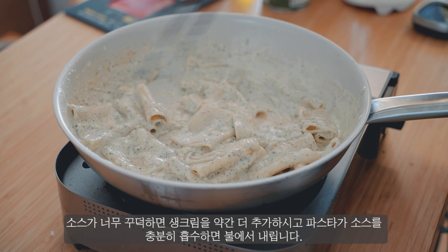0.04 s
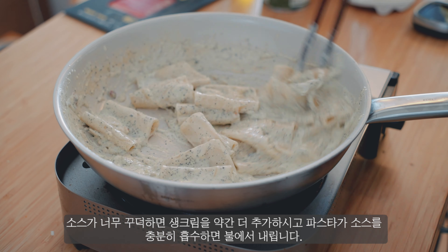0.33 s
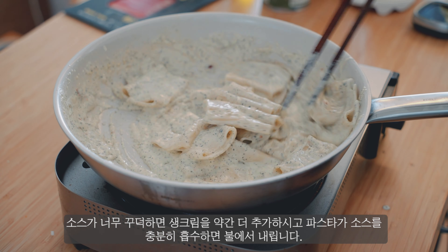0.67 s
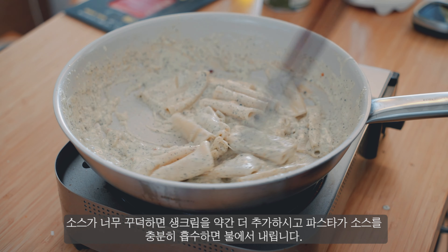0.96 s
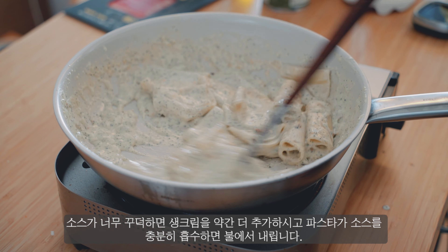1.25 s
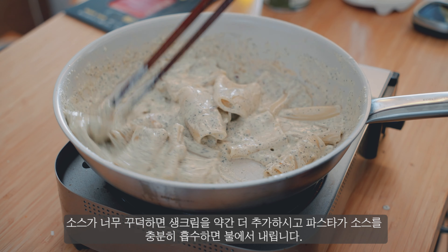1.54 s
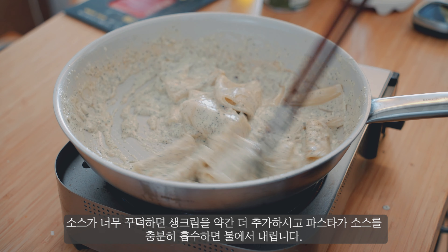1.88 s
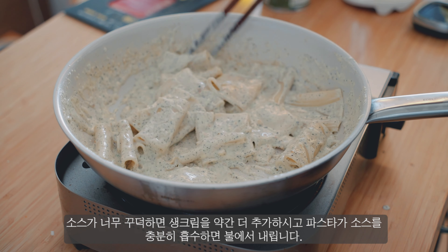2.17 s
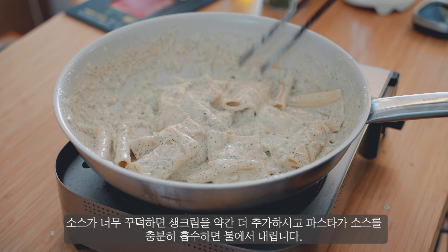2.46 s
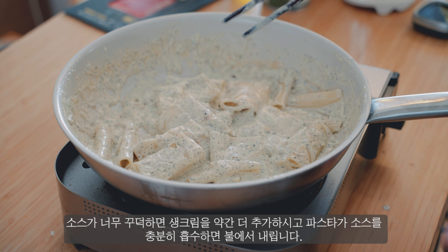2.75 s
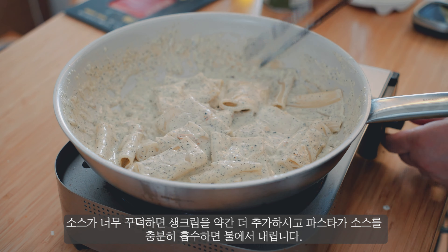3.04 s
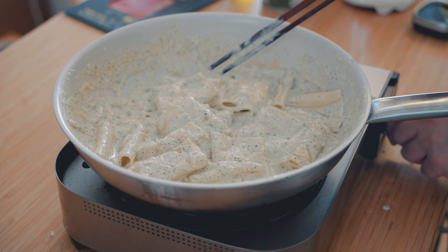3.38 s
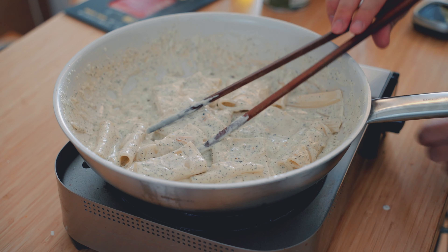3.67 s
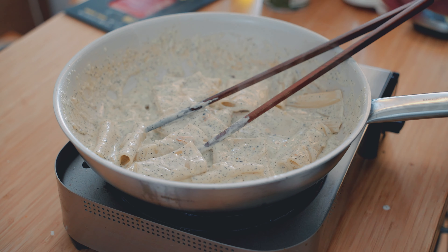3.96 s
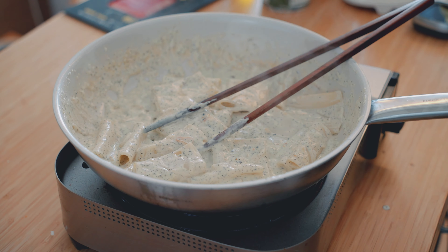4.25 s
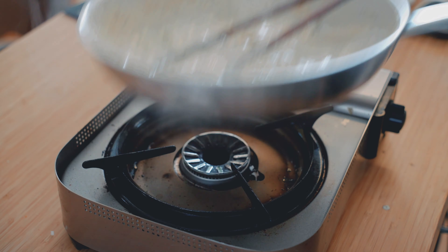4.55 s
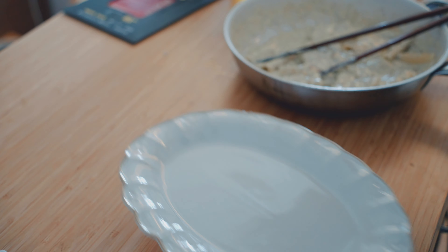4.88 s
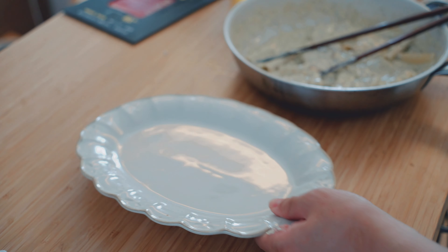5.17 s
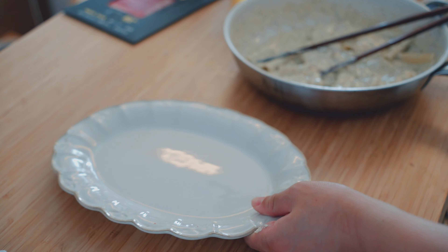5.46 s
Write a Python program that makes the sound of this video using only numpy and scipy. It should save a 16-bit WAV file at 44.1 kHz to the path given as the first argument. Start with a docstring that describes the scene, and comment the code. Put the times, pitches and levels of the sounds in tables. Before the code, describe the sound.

Chopsticks squelch through pasta and prod a frying pan while the sauce hisses and bubbles over a low gas burner. Three sharp, ringing taps on the rim follow, then a few dull stove knocks as the flame goes out. The sizzle dies away, leaving a quiet small kitchen. Finally a china plate is set down hard on wood right by the microphone, with a short scrape.

```python
"""A small kitchen, with pasta in cream sauce simmering in a frying pan on a portable gas stove. Steam hisses
and bubbles burst over the rumble of the flame, while long chopsticks stir, then tap the rim once softly and
three times hard and set it ringing. The gas is turned off and the pan is lifted away. Close to the microphone,
a china plate is set down hard on a wooden table and slid into place."""
import sys
import numpy as np
from scipy import signal
from scipy.io import wavfile

SR = 44100
rng = np.random.default_rng(int(sys.argv[2]) if len(sys.argv) > 2 else 0)


def waveform_to_disk(signal):
    """Save audio, clipped to [-1, 1], as 16-bit WAV at the path in sys.argv[1]."""
    frames = np.transpose(np.atleast_2d(signal))
    scaled = np.clip(frames, -1, 1) * 32767
    samples = np.round(scaled).astype(np.int16)
    wavfile.write(sys.argv[1], SR, samples)


N = 252252
TIME = np.arange(N) / SR
RING = TIME[:SR * 4 // 5]  # time axis of one blow dying away

# still kitchen air: frequency_hz, level_db
AIR_COLOUR = [(25, -16.5), (55, -4.5), (130, -8), (300, -4), (450, -9.5), (650, -15), (1200, -15.5),
              (2500, -24), (6500, -31), (16000, -38.5)]
# how long the walls echo: frequency_hz, t60_s
ROOM_DECAY = [(100, 0.61), (1000, 0.44), (5000, 0.18), (16000, 0.26)]
# the burner's rumble: frequency_hz, level_db
BURNER_COLOUR = [(30, -20.5), (70, -11.5), (130, -2), (220, 1), (330, -4.5), (480, -5.5), (700, -30.5),
                 (1500, -39.5)]
# dull knocks of gas knob, stove and pan support: start_s, level_db, centre_hz, t60_s
STOVE_KNOCKS = [(3.398, -37, 1180, 0.11), (3.411, -22.5, 1460, 0.039), (3.415, -29.5, 390, 0.071),
                (3.547, -40, 273, 0.15), (3.684, -38.5, 216, 0.14), (3.735, -41, 294, 0.42),
                (3.845, -29, 940, 0.027), (4.199, -29.5, 585, 0.17), (4.357, -41.5, 1140, 0.14),
                (4.415, -32.5, 530, 0.099)]
# sauce frying on hot metal: frequency_hz, level_db
SAUCE_COLOUR = [(200, 7), (500, -4.5), (1000, 7), (2000, 1), (4000, 2), (6500, -0.5), (9000, -3.5),
                (12000, -6), (16000, -6)]
# the crackle of larger bubbles: frequency_hz, level_db
BUBBLE_COLOUR = [(300, -30.5), (1200, 4), (3500, 0.5), (7000, 1.5), (10000, -9.5), (16000, -19.5)]
# how much the sauce is moved, by stirring and at last by lifting: time_s, agitation_0_to_1
SAUCE_AGITATION = [(0, 0.66), (.3, 0.16), (.68, 0.5), (1.33, 1), (1.9, 0.7), (2.35, 0.74), (2.88, .15),
                   (4.3, 0), (4.54, 0.66)]
# the largest bubbles bursting: start_s, peak_db, pitch_hz, t60_s
BUBBLE_POPS = [(0.215, -29, 5460, 0.034), (1.8119, -20, 5100, 0.0045), (1.941, -17, 5160, 0.0013),
               (2.424, -21.5, 6950, 0.001), (3.8164, -17.5, 3510, 0.0071), (3.8555, -27, 3480, 0.0038),
               (4.0668, -14.5, 3760, 0.0057), (4.179, -12, 3600, .0042), (4.4131, -18, 3650, 0.0055),
               (5.6768, -44.5, 4630, .0039)]
# wet pasta: frequency_hz, level_db
SQUELCH_COLOUR = [(200, -28), (480, 14.5), (750, -5), (1200, 4), (1950, -3), (2500, 2), (4000, -26),
                  (9000, -60)]
# the pan floor, damped by sauce: pitch_hz, level_db, t60_s
PAN_MODES = [(493, 3, 0.1), (1160, -11, 0.063), (1650, -73, 0.0053), (2000, 8, 0.0078), (2780, -4.5, 0.035),
             (3630, -12, 0.056)]
# chopsticks dragged over the pan floor: start_s, length_s, level_db, centre_hz, ring_share_db
STIR_STROKES = [(0.07, .11, -45.5, 1060, -1), (.217, 0.094, -43.5, 1180, -2), (0.347, 0.19, -43, 1080, -2),
                (.6, .019, -36, 960, 4), (0.729, 0.1, -40, 640, 1), (0.897, .1, -48, 1490, -7),
                (1.076, 0.072, -45, 1100, 5), (1.5, 0.18, -45.5, 1300, 0), (2.145, 0.16, -47.5, 790, 1.5),
                (3.718, 0.074, -41, 1240, 2)]
# chopstick tips meeting the pan floor: start_s, knock_peak_db, centre_hz, tick_peak_db, tick_hz
TIP_PRODS = [(.002, -23.5, 2400, -25, 4220), (.074, -27, 1100, -42, 3500), (0.4512, -22.5, 940, -45, 4500),
             (0.6037, -22.5, 1560, -43, 4500), (.678, -32.5, 1530, -20, 5400),
             (.838, -28, 2040, -21.5, 4600), (1.161, -16, 1470, -6, 11300), (3.371, -32, 1520, -24, 4180),
             (3.724, -28, 1320, -37, 3500)]
# chopsticks on the rim, each spot favouring one pitch: start_s, gain_db, tilt_db_per_octave, spot_hz
RIM_TAPS = [(2.13, -41.5, -5.5, 1190), (2.966, -20, -1, 3600), (3.0757, -19, 0.34, 3730),
            (3.2083, -20, -0.97, 2700)]
# the rim and the sticks ringing: pitch_hz, level_db, t60_s
RIM_MODES = [(253.5, -8.5, 0.19), (547, -12, 0.47), (969, -11, 0.31), (1213, -1, 0.13), (1503, -17, 0.38),
             (1777, 3.5, 0.095), (2030, -14.5, 0.047), (2036, 2, 0.075), (2365, -12, 0.054),
             (2592, -9.5, 0.43), (2805, 3, 0.045), (3295, 4.5, 0.023), (3510, 2.5, 0.15), (4360, 1, 0.083),
             (5170, 9, 0.043), (6140, 10.5, 0.043), (6630, -7.5, .11), (7640, 11, 0.019), (8720, 3, 0.024),
             (9630, 1, 0.031), (11700, -4.5, 0.031)]
# the clack of stick on metal: frequency_hz, level_db
CLACK_COLOUR = [(90, -23), (190, -12.5), (290, 0), (390, -16.5), (620, -9), (820, -11.5), (1450, -18),
                (2500, -2), (3400, -8.5), (4500, -12), (8000, -13), (10000, -19.5), (16000, -30.5)]
# china thudding on wood: frequency_hz, level_db
THUD_COLOUR = [(30, -44), (100, -12.5), (190, -0.5), (300, 1), (375, -6.5), (540, 4.5), (850, -3),
               (1700, -0.5), (2500, -10), (3300, -22.5), (5000, -34), (9000, -39), (16000, -66)]
# plate and table top ringing together: pitch_hz, level_db, t60_s
PLATE_MODES = [(179.5, -7, 0.27), (238.5, -8, 0.12), (302, -9, 0.27), (473, -11, 0.5), (562, -6.5, 0.39),
               (674, -11.5, 0.38), (943, -0.5, 0.23), (1015, -4, 0.31), (1070, -17.5, 0.14),
               (1465, -16, .1), (1615, -9, .14), (1830, -15.5, 0.12), (2236, -11, .1), (2650, -26, 0.1),
               (2620, -24, .14), (3450, -23, 0.13), (3790, -22, .11), (4130, -25, 0.13),
               (4940, -31.5, 0.13), (5620, -38.5, .13), (6300, -38.5, 0.12)]
# the table top under the full blow, heavily damped: pitch_hz, level_db, t60_s
TABLE_MODES = [(102, -34, 0.051), (580, -4, 0.044), (780, -1, 0.034), (923, 3.5, 0.032), (1490, 1.5, 0.03),
               (1825, -1.5, .025), (2380, -10.5, 0.017)]

TURN_DOWN_S, GAS_OFF_S, LIFT_S, HUSH_S = 2.7, 3.3, 4.54, 4.85
LAND_S, REST_S, BRAKE_S = 5.3052, 5.625, 0.071  # the plate brakes just before it rests
AIR_DB, HUM_HZ, HUM_DB = -57, 184, -61
FLAME_DB, FLAME_LOW_DB, FLAME_OUT_DB_PER_S = -47, -3, 130
STEAM_DB, STEAM_RISE_DB, SPRAY_DB, SPRAY_RISE_DB = -50.5, 5.5, -57, 6.5  # rises at full agitation
CRACKLE_DB, CRACKLE_GROWTH_DB_PER_S = -52, 2  # grows to this level as the sauce thickens
RECEDE_DB_PER_S, OFF_HEAT_DB = 37, -65
BLOW_DB, ROCK_DB, ROCK_LOSS_DB, ROCK_DULL_DB = -12, -20.5, .65, 0.8
ROCK_GAP_S, ROCK_JITTER_S = .0102, .0008
SLIDE_DB, SETTLE_DB, SETTLE_S = -33.5, 15, 0.072  # friction eases as the plate settles
JUDDER_HZ, JUDDER_RISE_HZ_PER_S = 241, 270


def amp(db):
    """Decibels to gain."""
    return 10 ** (np.asarray(db) / 20)


def unit(x):
    """Scales to an rms of 1."""
    return x / np.sqrt(np.mean(x ** 2) + 1e-20)


def read(points, hz):
    """Looks up a table on a log-frequency axis."""
    table_hz, value = np.transpose(points)
    return np.interp(np.log(hz + 1), np.log(table_hz), value)


def add(mix, start_s, sound):
    """Mixes a sound in at start_s."""
    part = mix[max(round(start_s * SR), 0):][:len(sound)]
    part += sound[:len(part)]


def since(start_s):
    """Seconds gone by since start_s, zero before it."""
    return np.maximum(TIME - start_s, 0)


def until(end_s, release_s):
    """A gain of 1 that falls to nothing over the last release_s before end_s."""
    return np.clip((end_s - TIME) / release_s, 0, 1)


def fade(t60):
    """A free decay of 60 dB in t60 seconds."""
    return np.exp(-np.log(1000) * RING / t60)


def hiss(size=N):
    """White noise."""
    return rng.standard_normal(size)


def waver(rate_hz):
    """A random drift below rate_hz, with an rms of 1."""
    return unit(signal.sosfilt(signal.butter(2, rate_hz, fs=SR, output="sos"), hiss()))


def colour(x, points):
    """Passes x through a body with this spectrum, ringing only after each push; rms of 1."""
    log_gain = np.log(amp(read(points, np.fft.rfftfreq(4096, 1 / SR))))
    mirrored = np.r_[log_gain, log_gain[-2:0:-1]]
    minimum_phase = np.exp(np.conj(signal.hilbert(mirrored)))
    response = np.fft.ifft(minimum_phase).real
    return unit(signal.oaconvolve(x, response)[:len(x)])


def band(x, hz, spread):
    """A resonance from hz / spread to hz * spread."""
    edges = np.minimum([hz / spread, hz * spread], [SR * .4, SR * .48])
    return signal.sosfilt(signal.butter(2, edges, "band", fs=SR, output="sos"), x)


def ring(modes):
    """The answer of a body to one blow; each mode starts up or down."""
    return sum(rng.choice([-1, 1]) * amp(db) * fade(t60) * np.sin(2 * np.pi * hz * RING)
               for hz, db, t60 in modes)


def burst(envelope, points):
    """A puff of coloured noise with the energy of the envelope."""
    return colour(hiss(len(RING)) * envelope, points) * np.sqrt(np.mean(envelope ** 2))


def clicks(per_s, spread_db):
    """Random impulses of either sign and of uneven size."""
    out = np.zeros(N)
    chance = rng.random(N) * SR / per_s
    at = np.flatnonzero(chance < 1)
    size = np.minimum(-np.log(chance[at]), 4)
    out[at] = (-1) ** at * amp(spread_db * size)
    return out


def ping(hz, t60):
    """A short ring and a trace of splatter, with a peak of 1."""
    splatter = band(hiss(len(RING)), hz * 0.87, spread=1.53) * fade(t60 * 1.65)
    pop = ring([(hz, 0, t60)]) + amp(-6) * splatter / abs(splatter).max()
    return pop / abs(pop).max()


def bubbles(per_s, spread_db, cycles, lo_hz=1500, hi_hz=15000):
    """Bubbles of many sizes burst, each ringing a few cycles; per_s counts those of one size."""
    out, t = np.zeros(N), RING[:1024]
    for hz in np.geomspace(lo_hz, hi_hz, 16):
        bubble = np.sin(2 * np.pi * hz * t) * np.exp(-hz * t / cycles)
        out += hz * signal.oaconvolve(clicks(per_s, spread_db), bubble)[:N]
    return unit(out)


def background_dip():
    """A gain that sinks 6 dB as the plate comes to rest."""
    return amp(-6 * (1 - until(REST_S, BRAKE_S)))


def room_tone():
    """Still air and a faint wavering hum, all around the microphone."""
    hum = amp(HUM_DB) * unit(band(hiss(), HUM_HZ, spread=1.05))
    air = amp(AIR_DB) * colour(hiss(), AIR_COLOUR)
    return (air + hum) * background_dip()


def wall_echoes(x, per_s=2500, first_s=.006):
    """Sparse reflections from the kitchen walls, each band dying at its own speed."""
    echoes = hiss(len(RING)) * (rng.random(len(RING)) < per_s / SR) * (RING > first_s)
    hz, t, spectrum = signal.stft(echoes, SR, nperseg=256)
    decay = np.exp(-np.log(1000) * t / read(ROOM_DECAY, hz)[:, None])
    tail = signal.istft(spectrum * decay, SR, nperseg=256)[1]
    return signal.fftconvolve(x, tail / np.linalg.norm(tail))[:N]


def flame():
    """The burner's fluttering rumble under the pan: turned down, then shut."""
    turned_down = 1 - until(TURN_DOWN_S, release_s=0.25)
    db = FLAME_DB + FLAME_LOW_DB * turned_down - FLAME_OUT_DB_PER_S * since(GAS_OFF_S)
    return colour(hiss(), BURNER_COLOUR) * amp(db + waver(rate_hz=25))


def stove_knocks(rise_s=.004):
    """Short rattles of the stove's loose metal parts, each with a brief brighter clink."""
    out = np.zeros(N)
    attack = np.minimum(RING / rise_s, 1)
    for start_s, db, hz, t60 in STOVE_KNOCKS:
        rattle = unit(band(hiss(len(RING)), hz, spread=1.73)) * fade(t60)
        clink = unit(band(hiss(len(RING)), hz * 4, spread=1.38)) * fade(t60=0.028)
        add(out, start_s, amp(db) * attack * (rattle + amp(-4.5) * clink))
    return out


def sizzle(spray_hz=8500):
    """Sauce steams and spits as it is pushed over hot metal; larger bubbles crackle on top."""
    agitation = np.interp(TIME, *np.transpose(SAUCE_AGITATION))
    surge = amp(1.57 * waver(rate_hz=17) + .5 * waver(rate_hz=350))
    fizz = bubbles(per_s=260, spread_db=2.5, cycles=1.44)
    sauce = colour((hiss() + amp(0.5) * fizz) * surge, SAUCE_COLOUR)
    treble = signal.sosfiltfilt(signal.butter(3, spray_hz, "high", fs=SR, output="sos"), sauce)
    steam = unit(sauce - treble) * amp(STEAM_DB + STEAM_RISE_DB * agitation)
    spray = unit(treble) * amp(SPRAY_DB + SPRAY_RISE_DB * agitation + 1.3 * waver(rate_hz=10))
    crackle = colour(bubbles(per_s=49, spread_db=7.0, cycles=3.5), BUBBLE_COLOUR)
    thickening = amp(CRACKLE_DB - CRACKLE_GROWTH_DB_PER_S * np.maximum(LIFT_S - TIME, 0))
    # the sizzle fades as the pan is lifted, then stops abruptly, leaving a faint simmer
    fade_out = amp(-RECEDE_DB_PER_S * since(LIFT_S)) * until(HUSH_S, release_s=0.017)
    simmer = amp(OFF_HEAT_DB) * background_dip() * (sauce + amp(-4.5) * crackle)
    return fade_out * (steam + spray + thickening * crackle) + simmer


def bubble_pops():
    """Single large bubbles burst with a sharp ping."""
    out = np.zeros(N)
    for start_s, db, hz, t60 in BUBBLE_POPS:
        add(out, start_s, amp(db) * ping(hz, t60))
    return out


def stirring():
    """Tips stick and slip through wet pasta, or prod the pan floor, and ring its damped modes."""
    out, pan = np.zeros(N), ring(PAN_MODES)
    slips = unit(clicks(per_s=1900, spread_db=5.0))
    ringing = unit(signal.oaconvolve(slips, pan)[:N])
    air_pockets = bubbles(per_s=18, spread_db=6.0, cycles=13, lo_hz=640, hi_hz=2440)
    squelch = colour(slips + amp(-13.5) * air_pockets, SQUELCH_COLOUR)
    for start_s, length_s, db, hz, ring_db in STIR_STROKES:
        span = slice(round(start_s * SR), round((start_s + length_s) * SR))
        stroke = band(squelch[span] + amp(ring_db) * ringing[span], hz, spread=1.86)
        add(out, start_s, amp(db) * unit(stroke) * signal.windows.tukey(len(stroke), .3))
    for start_s, db, hz, tick_db, tick_hz in TIP_PRODS:
        knock = band(pan + amp(11.5) * hiss(len(RING)) * fade(t60=0.031), hz, spread=2.6)
        tick = amp(tick_db) * ping(tick_hz, t60=0.0009)
        add(out, start_s, amp(db) * knock / abs(knock).max() + tick)
    return out


def rim_taps():
    """A hard clack, a brief buzz of the sticks against the rim, and the pan ringing on."""
    def lean_db(hz, tilt_db, spot_hz):
        """Each tap tilts the spectrum and favours the pitch of the spot that is struck."""
        favoured = np.exp(-(np.log2(hz / spot_hz) / 0.17) ** 2)
        return tilt_db * np.log2(hz / 3000) + 5 * favoured - 5.5

    out = np.zeros(N)
    buzz = np.interp(RING, [0, .018, .03], [1, .8, 0])
    contact = amp(9.5) * fade(t60=0.011) + amp(-4.5) * buzz
    for start_s, gain_db, tilt_db, spot_hz in RIM_TAPS:
        metal = ring([(hz, db + lean_db(hz, tilt_db, spot_hz), t60) for hz, db, t60 in RIM_MODES])
        clack = burst(contact, [(hz, db + lean_db(hz, tilt_db, spot_hz)) for hz, db in CLACK_COLOUR])
        add(out, start_s, amp(gain_db) * (metal + clack))
    return out


def plate_slide():
    """The plate's foot grinds over the grain in a quickening judder, then stops."""
    grit = unit(clicks(per_s=6200, spread_db=-0.5)) * amp(1.36 * waver(rate_hz=85))
    brighter = [(hz, db + 5 * np.log2(hz / 1000), t60) for hz, db, t60 in PLATE_MODES]
    china = ring(brighter) * np.minimum(RING / .0005, 1) * fade(t60=0.062)
    ringing = unit(signal.oaconvolve(grit, china)[:N])
    elapsed_s = since(LAND_S)
    judder_hz = JUDDER_HZ + JUDDER_RISE_HZ_PER_S * (elapsed_s - SETTLE_S)
    judder_hz *= np.exp(0.1 * waver(rate_hz=62))
    judder = np.sin(2 * np.pi * np.cumsum(judder_hz) / SR) * (1 + .5 * np.tanh(waver(rate_hz=110)))
    rub = amp(-6.5) * colour(grit, THUD_COLOUR) + amp(-10) * ringing + amp(-1) * judder
    friction = amp(SLIDE_DB + SETTLE_DB * np.exp(-elapsed_s / SETTLE_S))
    return rub * friction * np.minimum(elapsed_s / 0.062, 1) * until(REST_S, BRAKE_S)


def plate_landing(contacts=8):
    """Right by the microphone, china thuds on wood and rocks, each contact weaker and duller."""
    out = np.zeros(N)
    blow = amp(7.0) * fade(t60=0.016) + amp(-2) * fade(t60=0.12)
    for k in range(contacts):
        gain_db = ROCK_DB - ROCK_LOSS_DB * (k - 1) if k else BLOW_DB
        duller = [(hz, db - ROCK_DULL_DB * k * np.log2(1 + hz / 1000)) for hz, db in THUD_COLOUR]
        start_s = LAND_S + k * ROCK_GAP_S + min(k, 1) * rng.normal() * ROCK_JITTER_S
        add(out, start_s, amp(gain_db) * burst(blow, duller))
    soft_wood = np.minimum(RING / 0.0014, 1)  # the table yields, so the modes swell for a moment
    held = np.interp(RING, [.1, .28], [1, 0])  # the hand presses down and stills the ring
    wood = amp(-2.5) * ring(TABLE_MODES)
    china = amp(-14.5) * ring(PLATE_MODES) * held
    add(out, LAND_S, soft_wood * (wood + china))
    return out


def scene():
    """One microphone: the table close and nearly dry, the stove with more of the room on it."""
    stove = stirring() + bubble_pops() + stove_knocks() + rim_taps()
    table = plate_landing() + plate_slide()
    walls = wall_echoes(amp(-15) * stove + amp(-31) * table)
    return (stove + table + walls + sizzle() + flame() + room_tone())[None]


def record(dry, edge_hz=16000):
    """The loudest blows overload the microphone input; the treble ends at edge_hz."""
    clipped = dry / (1 + abs(dry) ** 14) ** (1 / 14)
    lowpass = signal.firwin(401, edge_hz, window=("kaiser", 10), fs=SR)
    return signal.oaconvolve(clipped, lowpass[None], "same")


dry = scene()
out = record(dry)
waveform_to_disk(out)
```